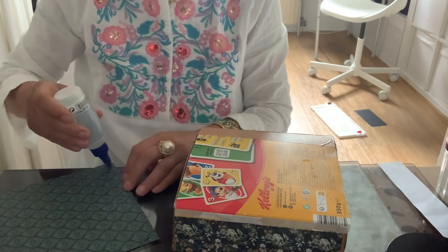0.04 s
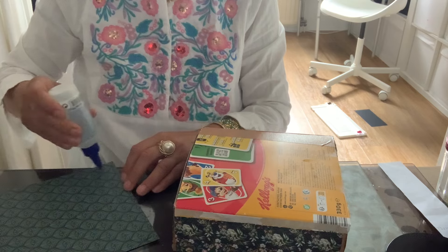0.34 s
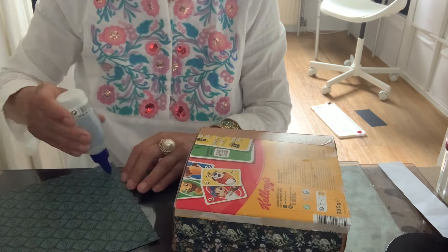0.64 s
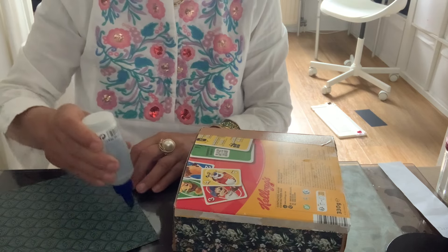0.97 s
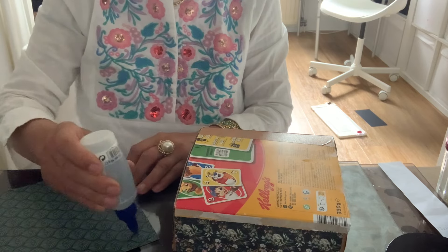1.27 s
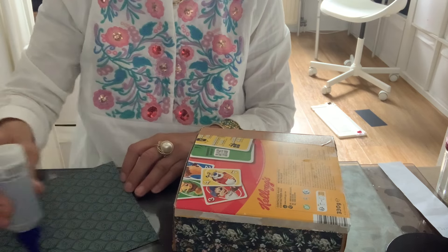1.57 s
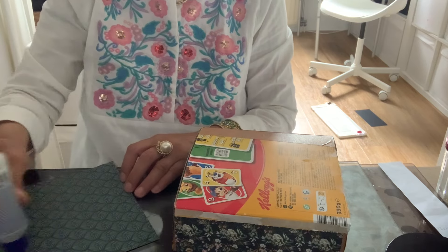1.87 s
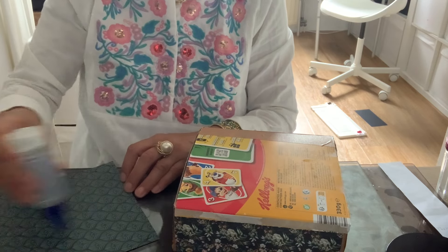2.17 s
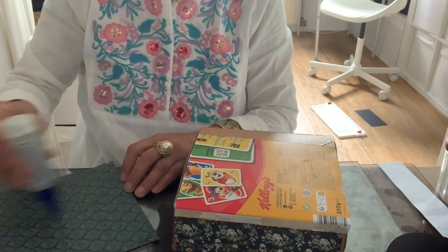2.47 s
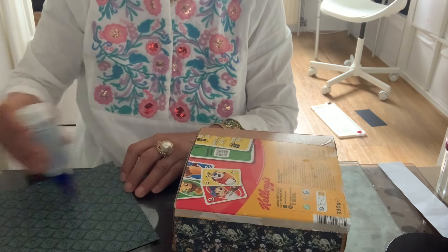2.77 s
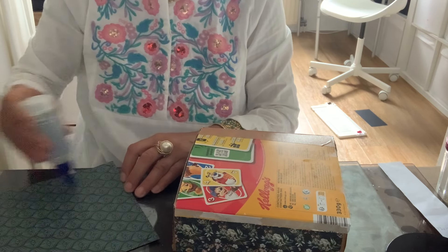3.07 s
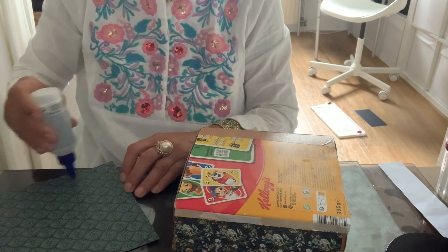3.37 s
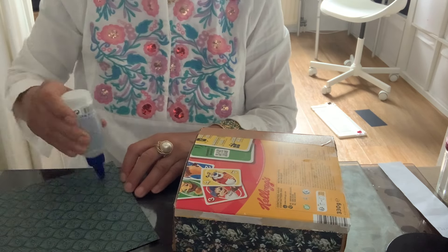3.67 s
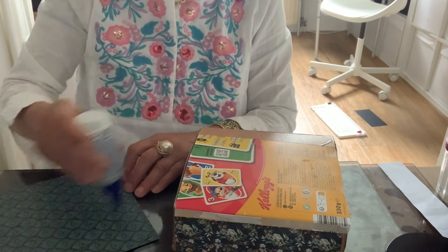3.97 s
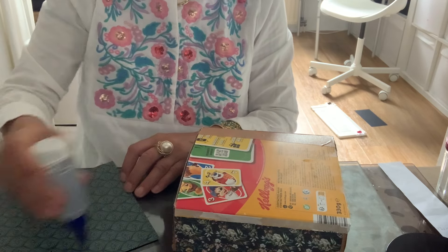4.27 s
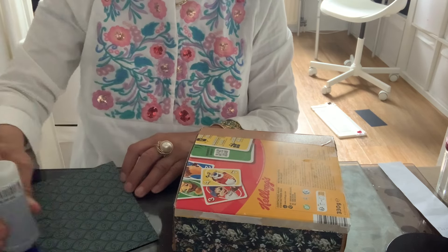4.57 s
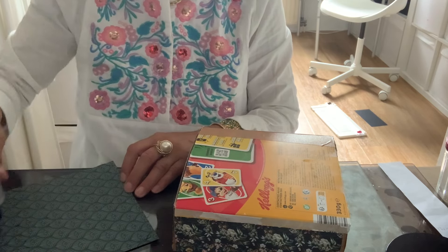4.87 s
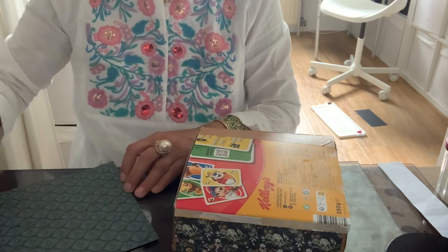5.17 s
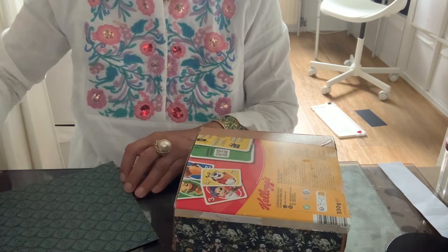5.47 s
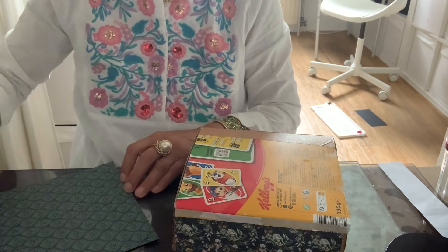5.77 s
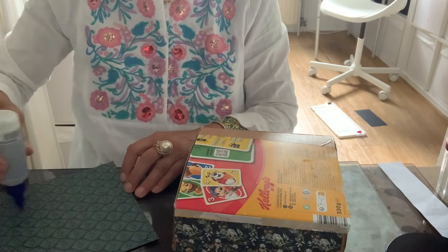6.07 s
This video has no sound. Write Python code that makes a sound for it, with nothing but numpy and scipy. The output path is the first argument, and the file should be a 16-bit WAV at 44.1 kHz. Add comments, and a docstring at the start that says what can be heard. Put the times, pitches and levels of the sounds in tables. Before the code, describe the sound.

Quick, scratchy strokes of a plastic nozzle on paper, with a low table rumble and a few light knocks and clicks.

```python
"""A glue bottle's plastic tip rubs back and forth over embossed paper on a table, about six strokes a second.
It catches on fibres, which hiss and ring bottle and table; it judders when pressed hard and squeaks once.
The table top drones and sways under the hand; a few knocks, plastic ticks and slides of the hand.
Small quiet room, microphones on the table to the right of the paper."""
import sys
import numpy as np
from scipy import signal
from scipy.fft import rfft, irfft, next_fast_len
from scipy.io import wavfile
from scipy.ndimage import map_coordinates

SR = 44100
rng = np.random.default_rng(int(sys.argv[2]) if len(sys.argv) > 2 else 0)


def digitize_waveform(pressure):
    """Quantize a signal to 16-bit integers and store it at the path in sys.argv[1].

    Rows of a 2-D input are taken as channels; values are limited to [-1, 1].
    """
    field = np.atleast_2d(pressure).T
    bounded = np.clip(field, -1, 1)
    quanta = np.round(bounded * 32767).astype(np.int16)
    wavfile.write(sys.argv[1], SR, quanta)


N = 274743

# tip strokes: start/s, end/s, crest/fraction of stroke, effort/dB, weight/dB (re a normal stroke)
STROKES = [(0.679, 1.036, 0.35, -19.5, -18), (0.883, 1.244, 0.39, -18.5, -14.5),
           (1.263, 1.378, 0.23, -18, -24), (1.341, 1.581, 0.22, -5.5, -3), (1.568, 1.704, 0.61, -2.8, 2),
           (1.74, 1.89, 0.38, 0, 2), (1.902, 2.086, .62, 2, 3), (2.076, 2.248, 0.63, 1, 1),
           (2.276, 2.372, 0.25, 0.7, 1), (2.395, 2.546, 0.49, -1.5, 0.5), (2.548, 2.705, .5, -0.5, 0),
           (2.706, 2.873, 0.53, 1.5, -.5), (2.878, 3.008, 0.63, 1.2, 1.5), (3.027, 3.201, 0.53, 0, -1),
           (3.206, 3.362, 0.34, -1.5, -1.5), (3.368, 3.541, 0.42, -4.5, -1), (3.524, 3.667, 0.69, 2, 3),
           (3.672, 3.814, 0.61, -0.7, 0), (3.823, 3.961, 0.27, 1.1, 3.5), (3.95, 4.068, 0.39, 1, 2.5),
           (4.066, 4.183, 0.59, 1.3, -1), (4.187, 4.325, 0.43, 2.5, 2), (4.321, 4.443, 0.66, -4, 1),
           (4.443, 4.606, .34, 0, 6), (4.558, 4.711, 0.7, -10.5, -3), (4.692, 4.84, 0.33, -4.5, -3),
           (4.803, 5.044, 0.59, -5, -4.5), (5.061, 5.16, 0.079, -17, -8.5), (5.123, 5.313, 0.25, -10, -4),
           (5.32, 5.618, 0.28, -9, -9), (5.682, 5.925, 0.91, -14.5, -10), (5.895, 6.17, 0.41, -10, -6),
           (6.07, 6.28, 0.65, -11.5, -4)]
# normal stroke, rows push, pull, paper edge: drone/dB, rasp/dB, hiss/dB, table flex/dB
GRIPS = [(-46.5, -52, -62, -43), (-47, -52.5, -60.5, -51.5), (-43, -53, -58.5, -50.5)]
# modes of the table top and what lies on it: f/Hz, width/Hz, level/dB
TABLE_MODES = [(104.3, 12, 5), (192, 14.7, -5), (281.3, 41.6, 2), (360, 80.6, -1), (410.2, 75, -2.5),
               (522, 69, -10.5), (560.3, 21.7, -5.5), (694, 43, -13.5), (821, 81, -11.5), (972, 51, -15.5),
               (1179, 6.7, -8), (1555, 34, -14), (1670, 110, -47), (2316, 110, -14.5)]


def rubbing():
    """One friction force drives table drone, bottle rasp and fibre hiss; the hiss needs most speed."""
    # resonances when pushed, pulled and at the paper's edge: f/Hz, width/Hz, level/dB
    push_modes = [(754, 65, -6.5), (950, 37, 2), (1120, 69, -8.5), (1416, 130, -3), (1791, 62, -5),
                  (1974, 160, -13), (2614, 40, -6), (3020, 160, -16)]
    pull_modes = [(835, 150, -9.5), (916, 82, 1.5), (1193, 54, -7.5), (1424, 62, 0), (1715, 115, -3.5),
                  (1910, 36, -4), (2408, 20, -7), (2810, 89, -9)]
    edge_modes = [(782, 39, -9), (879, 200, -13), (1220, 91, -8.5), (1465, 57, 1), (1740, 82, -6.5),
                  (2560, 33, -9), (3030, 47, -22)]
    # spectra of table drive, fibre hiss and tip contact: f/Hz, level/dB
    drone_eq = [(60, -20.5), (150, -4), (260, -10), (440, -1), (570, -10.5), (750, -13), (1200, -16)]
    fibre_eq = [(1400, -18), (2100, 4.5), (2300, 3), (2700, -2.5), (3500, -3.5), (5000, -3.5), (6000, -10),
                (7000, -8), (7650, -21), (8300, -10), (10000, -20), (11200, -22.5), (12300, -43),
                (15000, -55)]
    contact_eq = [(300, -19), (700, 7), (2900, 0.5), (4500, -21)]
    drone, hiss, rasp = np.zeros(N), np.zeros(N), np.zeros((3, N))  # power envelopes
    for speed, effort_db, weight_db, grip in strokes():
        drone_db, rasp_db, hiss_db = GRIPS[grip][:3]
        drone += amp(drone_db + weight_db) ** 2 * speed ** 2
        rasp[grip] += amp(rasp_db + effort_db) ** 2 * speed ** 3.14
        hiss += amp(hiss_db + 1.17 * effort_db) ** 2 * speed ** 3.88
    friction = catches(rate_hz=2000, spread_db=2.5, sliding=0.89)
    embossing = amp(0.55 * wobble(170) + 1.48 * wobble(35))
    force = unit(friction * embossing)
    paths = [(drone, lambda x: coloured(resonate(x, TABLE_MODES), drone_eq)),
             (rasp[0], lambda x: tilt(coloured(resonate(x, push_modes), contact_eq))),
             (rasp[1], lambda x: tilt(coloured(resonate(x, pull_modes), contact_eq))),
             (rasp[2], lambda x: coloured(resonate(x, edge_modes), contact_eq)),
             (hiss, lambda x: coloured(x, fibre_eq))]
    white = rng.standard_normal(N)  # normalises each path's gain
    return sum(path(np.sqrt(power) * force) / path(white).std() for power, path in paths)


def strokes(edge_s=4.55):
    """Speed, effort, weight, grip per stroke: push (0) and pull (1) alternate up to the paper edge (2)."""
    for i, (start, end, crest, effort_db, weight_db) in enumerate(STROKES):
        yield swing(start, end, crest), effort_db, weight_db, i % 2 if start < edge_s else 2


def catches(rate_hz, spread_db, sliding):
    """Friction force: tiny uneven slips over smooth sliding noise."""
    onsets = rng.random(N) < rate_hz / SR
    slips = onsets * rng.standard_normal(N) * amp(spread_db * rng.standard_normal(N))
    return unit(unit(slips) + sliding * rng.standard_normal(N))


def tilt(x, depth=0.03435, stroke_s=0.16):
    """The bottle tilts as it travels: resonances rise through a pull, sink through a push."""
    turns_s, t = np.transpose(STROKES)[1], clock()
    travel = np.interp(t, turns_s, np.arange(len(turns_s)))
    delay_s = depth * stroke_s / np.pi * np.sin(np.pi * travel)
    return map_coordinates(x, [(t - delay_s) * SR])


def judders(jitter=0.025, drift=0.017, spread_db=3, overtone=0.025, lock=1.8, gain_db=1):
    """Hard-pressed tip: the slip rate climbs with speed, locks onto a bottle resonance, then falls."""
    # stick-slip bursts: start/s, end/s, top slip rate/Hz, level/dB
    bursts = [(2.575, 2.681, 583.6, -44), (2.92, 3.019, 532, -45.5), (3.245, 3.358, 572, -47),
              (3.565, 3.675, 560, -50.5), (3.836, 3.906, 568, -42.5), (4.100, 4.155, 573.4, -42),
              (4.218, 4.27, 367.5, -43), (4.356, 4.401, 581, -54), (4.526, 4.605, 307, -37.5)]
    out = np.zeros(N)
    uneven = np.exp(jitter * wobble(220) + drift * wobble(35))
    sizes = amp(spread_db * wobble(240))
    for start, end, top_hz, db in bursts:
        speed = swing(start, end, crest=0.37)
        slip_hz = top_hz * np.minimum(lock * speed ** 1.3, 1) * uneven
        phase = 2 * np.pi * np.cumsum(slip_hz) / SR
        out += amp(db + gain_db) * speed ** 1.1 * sizes * (np.sin(phase) + overtone * np.sin(2 * phase))
    return coloured(out, [(40, -24), (90, 5), (1200, 4.5), (2500, -38), (6000, -60)])


def squeak(jitter=0.035, ring_db=-5):
    """Slowly dragged tip: a thin, raspy, sinking tone over two high bottle modes."""
    # squeak contour: t/s, f/Hz, level/dB
    contour = [(.71, 3160, -95), (.745, 3095, -83), (0.801, 2874, -75.5), (0.851, 2630, -78),
               (.90, 2440, -80), (.98, 2430, -88), (1.021, 2470, -105)]
    s, hz, db = np.transpose(contour)
    t = clock()
    slip_hz = np.interp(t, s, hz) * np.exp(jitter * wobble(1400))
    tone = np.sin(2 * np.pi * np.cumsum(slip_hz) / SR)
    ring = unit(resonate(rng.standard_normal(N), [(2440, 83, -6), (4250, 150, -19)]))
    level_db = np.interp(t, s, db, left=-200, right=-200) + 2.5 * wobble(120)
    return amp(level_db) * (tone + amp(ring_db) * ring)


def rocking(sway_gain_db=-1, flex_gain_db=4, lag_s=0.029):
    """Envelopes of the two lowest table modes: both tremble, leans add sway, strokes add lagging flex."""
    # trembling under the arm's weight: t/s, sway/dB, flex/dB
    load = [(0.0, -46.5, -94), (0.33, -77, -77), (0.54, -46, -58.5), (0.88, -54, -51), (1.25, -56, -62.5),
            (1.84, -48.5, -57), (2.65, -54, -69.5), (3.38, -51, -61.5), (3.83, -60, -52),
            (4.02, -45.5, -48.5), (4.87, -47.5, -59), (5.33, -46, -60.5), (5.66, -48, -63.5),
            (6.23, -53, -70)]
    # the arm leans harder: start/s, end/s, level/dB
    leans = [(0.337, 0.658, -37), (1.036, 1.266, -47.5), (1.378, 1.52, -46), (1.55, 1.73, -40.5),
             (1.895, 2.057, -38.5), (2.28, 2.416, -43), (3.204, 3.477, -45.5), (3.527, 3.67, -41.5),
             (3.83, 4.013, -42), (4.0, 4.315, -37), (5.147, 5.297, -30), (5.287, 5.58, -41.5),
             (5.832, 5.97, -35), (6.072, 6.174, -39.5)]
    s, sway_db, flex_db = np.transpose(load)
    t = clock()
    sway_power = amp(np.interp(t, s, sway_db) + sway_gain_db) ** 2
    sway_power += sum((amp(db) * swing(start, end, crest=0.56)) ** 2 for start, end, db in leans)
    presses = sum((amp(GRIPS[grip][3] + 0.51 * weight_db) * speed) ** 2
                  for speed, _, weight_db, grip in strokes())
    flex_power = amp(np.interp(t, s, flex_db) + flex_gain_db) ** 2 + np.interp(t - lag_s, t, presses)
    return np.sqrt([sway_power, flex_power])


def table_sway(envelopes, sway_hz=59, flex_hz=99):
    """The two lowest table modes, driven unevenly by the moving arm."""
    t = clock()
    sway = np.sin(2 * np.pi * sway_hz * t + 1.48 * wobble(16)) * amp(5.3 * wobble(40))
    flex = np.sin(2 * np.pi * flex_hz * t + 1.42 * wobble(26)) * amp(4.2 * wobble(35))
    return envelopes[0] * unit(sway) + envelopes[1] * unit(flex)


def knocks(push_gain_db=47, scuff_gain_db=14.5, scuff_t60_s=0.062):
    """Short pushes ring the table, longer and duller if soft; the tip scuffs the paper."""
    # blows on the table: t/s, level/dB, contact cut-off/Hz, scuff/dB
    blows = [(0.604, -40.5, 380, -60), (0.617, -18.5, 100, -67.5), (0.936, -24, 70, -95),
             (2.292, -28.5, 825, -45.5), (2.302, -41, 300, -56), (2.649, -29, 85, -83),
             (3.895, -34, 170, -80), (4.041, -31.5, 248, -73), (4.079, -39.5, 1010, -56),
             (4.139, -26, 130, -78), (4.226, -34, 790, -61), (5.163, -41.5, 900, -68)]
    # scuff spectrum: f/Hz, level/dB
    scuff_eq = [(150, -8), (400, 17), (1000, 2), (2000, -4.5), (4000, -21.5), (6000, -29), (12000, -43)]
    force, scuffs, t = np.zeros(N), np.zeros(N), np.arange(SR // 6) / SR
    for s, db, cutoff_hz, scuff_db in blows:
        push = t ** 2 * np.exp(-3 * np.pi * cutoff_hz * t)
        force[round(s * SR):][:len(t)] += amp(db + push_gain_db) * push / push.sum()
        decay = amp(scuff_db + scuff_gain_db - 60 * t / scuff_t60_s)
        scuffs[round(s * SR):][:len(t)] += decay * rng.standard_normal(len(t))
    return resonate(force, TABLE_MODES) + coloured(scuffs, scuff_eq)


def ticks(gain_db=3, snap_t60_s=0.02, tail_db=-19, tail_t60_s=0.19):
    """The bottle's plastic snaps, then rings briefly."""
    # snaps: t/s, level/dB
    events = [(0.226, -57), (4.078, -66), (4.996, -36.5), (5.172, -42.5), (5.245, -58)]
    # snap spectrum: f/Hz, level/dB
    plastic_eq = [(300, -38), (900, 0), (1700, 2), (3000, -0.5), (5000, -6.5), (8500, -8.5), (11000, -14.5),
                  (15000, -32)]
    snaps, t = np.zeros(N), np.arange(SR // 8) / SR
    decay = amp(-60 * t / snap_t60_s) + amp(tail_db - 60 * t / tail_t60_s)
    for s, db in events:
        snaps[round(s * SR):][:len(t)] += amp(db + gain_db) * decay * rng.standard_normal(len(t))
    return coloured(snaps, plastic_eq)


def hand_slides():
    """The heel of the hand slides softly, stirring only the low table modes."""
    # slides: start/s, end/s, level/dB
    slides = [(0.097, 0.323, -70), (0.3, 0.41, -51), (0.705, 0.926, -55.5), (0.9, 1.153, -49.5)]
    # skin contact spectrum: f/Hz, level/dB
    skin_eq = [(60, -6), (110, 2.5), (200, 4.5), (280, -18), (420, -6.5), (600, -18), (1200, -52)]
    envelope = sum(amp(db) * swing(start, end, crest=0.49) for start, end, db in slides)
    return envelope * unit(coloured(resonate(rng.standard_normal(N), TABLE_MODES), skin_eq))


def microphones(x, lead_s=0.000684):
    """Airborne sound reaches the left microphone first and, in most bands, louder."""
    # stereo balance: f/Hz, left minus right/dB
    balance = [(60, -2.5), (110, 10.5), (190, -10.5), (300, 11.5), (560, -2), (900, 10.5), (1260, 7.5),
               (2320, 5.5), (4280, 30), (7000, 17.5), (9000, 47), (14000, -12)]

    def response(hz):
        ratio = amp(along(balance, hz))
        airborne = along([(340, 0.12), (540, 0.99)], hz)  # bass reaches both through the table
        lead = np.exp(1j * np.pi * hz * airborne * lead_s)
        return np.array([ratio * lead, 1 / lead]) * np.sqrt(2 / (1 + ratio ** 2))
    return filtered(x, response)


def scatter(x, level_db=-6.5, t60_s=0.039, frame=8192):
    """Reflections off hand, arm and table, changing with the movement."""
    t, hop = np.arange(SR // 20) / SR, frame // 2
    padded = np.pad(coloured(x, [(100, -17), (350, -7.5), (600, 4.5)]), (hop, 2 * frame))
    out, fade = np.zeros((2, len(padded))), np.sqrt(np.hanning(frame))
    for start in range(0, N + hop - len(t), hop):
        echoes = rng.standard_normal((2, len(t))) * amp(-60 * t / t60_s)
        echoes /= np.linalg.norm(echoes, axis=1, keepdims=True)
        piece = signal.fftconvolve((fade * padded[start:start + frame])[None], echoes, axes=1)
        out[:, start:start + piece.shape[1]] += piece
    return amp(level_db) * out[:, hop:hop + N] * amp([[2], [-2]])


def room(x, level_db=-14, delay_samples=200):
    """The walls add a short tail."""
    # reverberation: f/Hz, t60/s
    decay_times = [(100, 0.16), (500, 0.19), (2000, 0.18), (6000, 0.25), (14000, 0.018)]
    hz, t, noise = signal.stft(rng.standard_normal((2, SR // 2)), SR, nperseg=256)
    tail = signal.istft(noise * amp(-60 * t / along(decay_times, hz)[:, None]), SR, nperseg=256)[1]
    tail /= np.linalg.norm(tail[0])
    return amp(level_db) * signal.fftconvolve(np.pad(x, (delay_samples, 0))[None], tail, axes=1)[:, :N]


def background(air_db=-59):
    """Low room rumble, hiss and a faint electronic whine."""
    # room noise spectrum: f/Hz, level/dB
    air_eq = [(20, -29), (45, -10.5), (60, -2), (100, -22), (150, -26.5), (190, -15.5), (250, -39),
              (330, -31), (600, -47.5), (1500, -47), (3000, -52.5), (7500, -57.5), (10000, -53.5),
              (15000, -64)]
    # whine tones: f/Hz, level/dB
    tones = [(1985, -98.5), (9359, -100)]
    mid, side = coloured(rng.standard_normal((2, N)), air_eq)
    side = coloured(side, [(80, 0.5), (400, 3.5), (1500, 0)])
    whine = sum(amp(db) * unit(np.sin(2 * np.pi * hz * clock() + 0.31 * wobble(25))) for hz, db in tones)
    return amp(air_db) * unit(np.array([mid + side, mid - side])) + whine


def amp(db):
    """dB to gain."""
    return 10 ** (np.asarray(db) / 20)


def unit(x):
    """Scale to rms 1."""
    return x / np.sqrt(np.mean(x ** 2) + 1e-20)


def clock():
    """Sample times in s."""
    return np.arange(N) / SR


def along(points, hz):
    """Interpolate (f/Hz, value) points on a log axis."""
    f, values = np.transpose(points)
    return np.interp(np.log(hz + 1), np.log(f), values)


def wobble(rate_hz):
    """Smooth random curve, rate_hz knots a second."""
    t, knots = clock(), rng.standard_normal(16384)
    return np.interp(t, t[::8], map_coordinates(knots, [t[::8] * rate_hz], mode="wrap"))


def swing(start_s, end_s, crest):
    """Arch 0-1-0 from rest to rest, peaking at the fraction crest of its length."""
    arch, t = np.zeros(N), clock()
    moving = (t > start_s) & (t < end_s)
    peak_s = start_s + np.clip(crest, 0.05, 0.95) * (end_s - start_s)
    arch[moving] = np.abs(np.sin(np.pi * np.interp(t[moving], [start_s, peak_s, end_s], [0, 0.5, 1])))
    return arch


def filtered(x, response):
    """Apply a complex frequency response."""
    size = next_fast_len(N + SR // 2)
    return irfft(rfft(x, size) * response(np.fft.rfftfreq(size, 1 / SR)), size)[..., :N]


def coloured(x, spectrum):
    """Shape by (f/Hz, level/dB) points."""
    return filtered(x, lambda hz: amp(along(spectrum, hz)))


def resonate(x, modes):
    """Ring (f/Hz, width/Hz, level/dB) modes of alternating sign."""
    return filtered(x, lambda f: sum((-1) ** k * amp(db) * 1j * f * bw / (f0 * f0 - f * f + 1j * f * bw)
                                     for k, (f0, bw, db) in enumerate(modes)))


def scene(twist_db=-10):
    """Everything on the table, heard directly, off near surfaces and through the room."""
    envelopes = rocking()
    work = rubbing() + judders() + squeak() + knocks() + ticks() + hand_slides()
    low_cut = [(36, -29), (46, -8), (54, -1)]  # the sway carries little below about 45 Hz
    heave, twist = coloured(np.array([table_sway(envelopes), table_sway(envelopes)]), low_cut)
    twist = amp(twist_db) * twist * np.array([[1], [-1]])  # moves the microphones in antiphase
    return microphones(work + heave) + twist + scatter(work) + room(work) + background()


def record(dry, top_hz=15000):
    """Brick-wall band limit."""
    return filtered(dry, lambda hz: hz < top_hz)


dry = scene()
out = record(dry)
digitize_waveform(out)
```